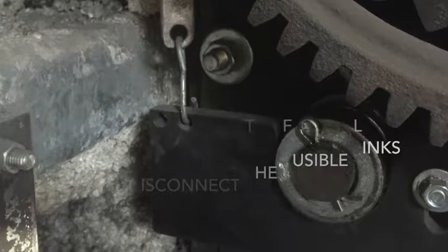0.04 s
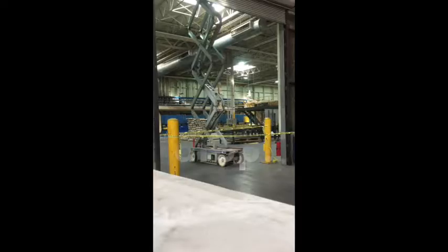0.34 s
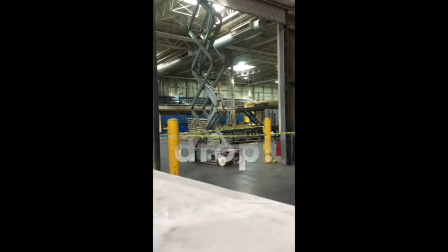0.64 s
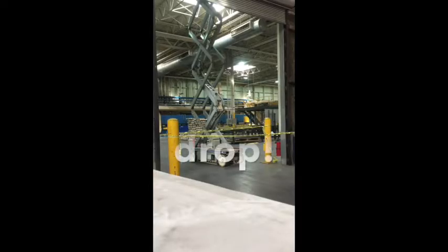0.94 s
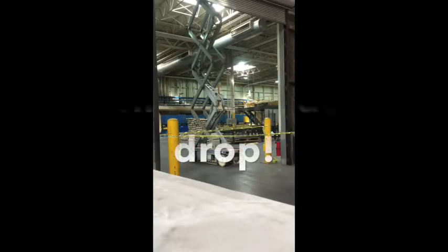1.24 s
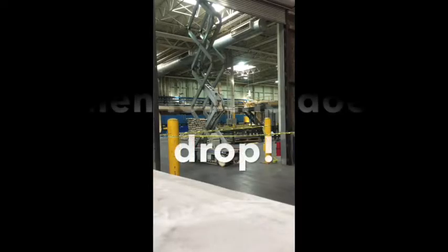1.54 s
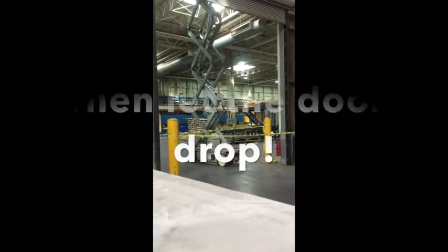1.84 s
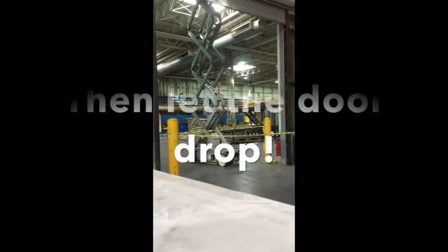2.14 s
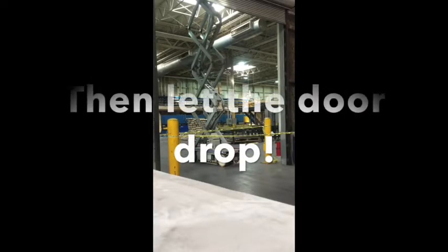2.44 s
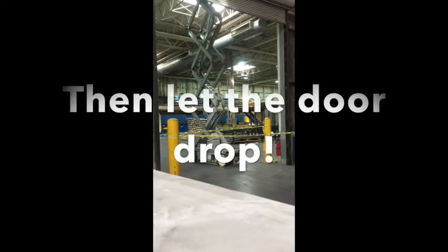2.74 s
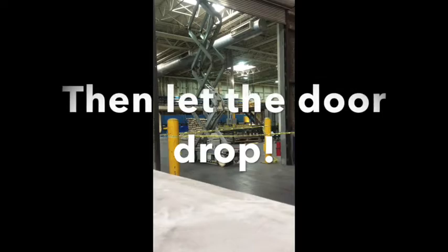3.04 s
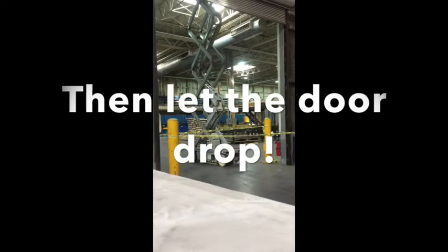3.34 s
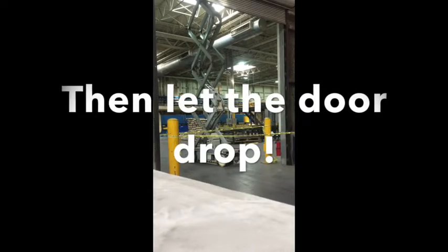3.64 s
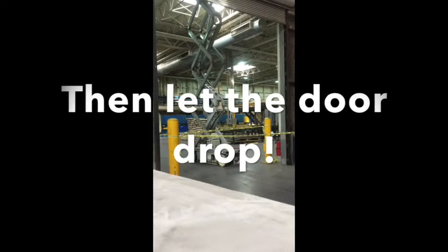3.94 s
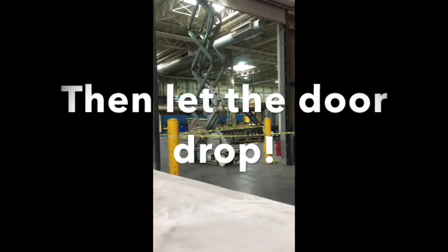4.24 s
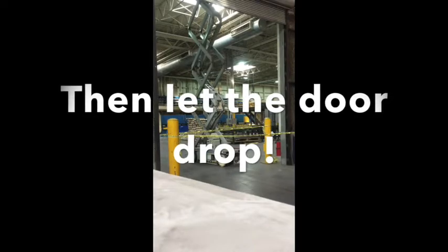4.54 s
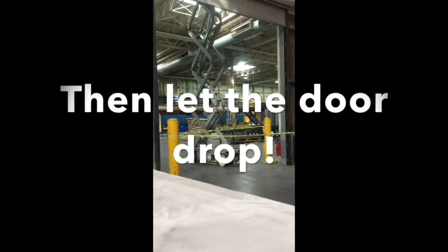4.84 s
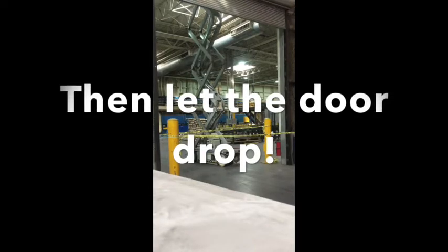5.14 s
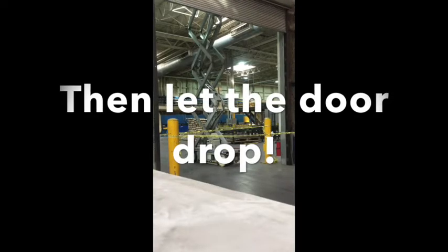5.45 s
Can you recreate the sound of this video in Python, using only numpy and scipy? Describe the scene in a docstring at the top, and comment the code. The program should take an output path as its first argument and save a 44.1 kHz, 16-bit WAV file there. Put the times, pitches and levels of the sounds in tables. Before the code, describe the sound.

Over faint machine rumble and far knocks, a metal roll-up door is released and comes clattering and booming down in a large hall.

```python
"""A steel roll-up door is let go in a large, quiet warehouse.
First, far machinery rumbles and hums; a motor strains and eases off, and hollow knocks and squeaks
carry across the hall. After a soft scuff the catch snaps open and a loose link swings against the gear.
The slack runs out: the slatted curtain lurches with a crash and starts to run down, its joints rattling,
its slats clacking in the guides and its sheet booming like a drum skin, while the hall rings along."""
import sys
import numpy as np
from scipy import signal
from scipy.fft import rfft, irfft, next_fast_len
from scipy.io import wavfile
from scipy.ndimage import uniform_filter1d

SR = 44100
rng = np.random.default_rng(int(sys.argv[2]) if len(sys.argv) > 2 else 0)


def digitize_waveform(pressure):
    """Quantize a signal to 16-bit integers and store it at the path in sys.argv[1].

    Rows of a 2-D input are taken as channels; values are limited to [-1, 1].
    """
    field = np.atleast_2d(pressure).T
    bounded = np.clip(field, -1, 1)
    quanta = np.round(bounded * 32767).astype(np.int16)
    wavfile.write(sys.argv[1], SR, quanta)


N = 251370
TIME = np.arange(N) / SR
RING_TIME = TIME[:SR]  # one second for each hit to ring out
SURGE_S, SCUFF_S, RELEASE_S = 0.77, 4.14, 4.52  # cues
SOFT_BLOW_DB = -30.5  # brightness and boom are scaled from a blow this hard

# room tone of the still air: (frequency [Hz], density [dB])
AIR_SPECTRUM = [(20, -19), (34, -33), (44, -18), (60, -18), (130, -17.5), (300, -22.5), (420, -18.5),
                (800, -30), (3000, -38.5), (6500, -43), (9000, -45.5), (15500, -53)]
# the warehouse's reverb time: (frequency [Hz], t60 [s])
HALL_DECAY = [(80, 3), (250, 0.42), (700, 1.84), (2000, 2.1), (4500, 1.66), (8000, 0.68), (15000, 0.71)]
# swells of the machinery's deep rumble: (time [s], level [dB])
RUMBLE_LEVEL = [(0.34, -68), (0.56, -51), (1.0, -49.5), (1.23, -66), (1.4, -52), (1.88, -62.5), (1.95, -49),
                (2.12, -66), (2.61, -48), (3.16, -67), (4.04, -71.5), (4.38, -67)]
# how hard the machinery works: (time [s], level [dB])
WORKLOAD = [(0.34, -55.5), (0.58, -52), (0.82, -45.5), (1.05, -49), (1.5, -60), (2.1, -56.5), (2.45, -53),
            (2.75, -60.5), (2.9, -65.5), (3.24, -74), (3.4, -60.5), (3.6, -65), (3.85, -79), (4.38, -62)]
# its deep rumble, low-mid body and hiss: (frequency [Hz], density [dB])
RUMBLE_SPECTRUM = [(20, -44), (30, -24), (36, -15), (44, 22), (58, 3), (72, 7.5), (88, 7), (110, -6.5),
                   (170, -59)]
BODY_SPECTRUM = [(70, -9), (125, -1.5), (152, -3), (178, 9), (205, 1.5), (232, 2.5), (280, -10),
                 (350, -3.5), (420, -10.5), (480, -13), (555, -13.5), (640, -10), (760, -27), (1300, -67.5)]
HISS_SPECTRUM = [(400, -19), (800, -3), (1200, -6.5), (1620, -10.5), (1950, -12), (2300, -12), (3000, -17),
                 (5000, -27.5), (8000, -38), (11000, -52), (16000, -70)]
# its hum and whine, and the metal it scrapes along: (frequency [Hz], width [Hz], relative level [dB])
HUM_TONES = [(85, 2.9, -5.5), (156, 17, -14.5), (317, 9.8, -20)]
WHINE_TONES = [(639, 6.28, 3.5), (584, 8.8, -3), (950, 12.3, -8), (1615, 6.3, -14.5), (1934, 16, -14)]
SCRAPED_MODES = [(970, 27, -15), (1340, 130, -12), (1627, 43, -6), (1936, 62, 1), (3330, 38, -10),
                 (4030, 41, -12), (4910, 30, -20)]
# hum, whine and scrape of one straining motor: (peak [dB], rise [dB/s], fall [dB/s])
SURGE_HUM = (-35, 98, 180)
SURGE_WHINE = (-52.5, 60, 33)
SURGE_SCRAPE = (-54.5, 69, 44)
# far knocks: (time [s], level before trim [dB], t60 [s], tilt [dB/octave])
KNOCK_HITS = [(1.118, -52.5, 0.98, 1.5), (1.879, -54, 0.3, 2.5), (2.367, -53.5, 0.52, 3.5),
              (3.281, -56, .27, 2.5), (3.345, -56, .24, 3.5), (3.449, -54, 0.33, -21),
              (3.565, -55.5, 0.13, -15), (4.292, -51.5, 0.21, -23)]
# their thud: (frequency [Hz], density [dB])
THUD_SPECTRUM = [(120, -66), (350, 11), (600, 3), (900, -10), (2500, -27), (6000, -40), (12000, -79)]
# the hollow body they ring: (frequency [Hz], relative level [dB], t60 [s])
HOLLOW_MODES = [(280.4, 3, 0.34), (389.5, -2.5, 0.38), (463.6, 0.5, 0.24), (559, -6.5, 0.27),
                (627, -2.5, 0.34)]
# far squeaks of metal: (time [s], level before trim [dB], pitch [Hz])
SQUEAK_CUES = [(1.109, -70, 1640), (1.135, -67, 2170), (1.179, -78, 2750), (1.882, -71, 2470)]
# swell of the scuff: (peak [dB], rise [dB/s], fall [dB/s])
SCUFF_SWELL = (-63, 320, 210)
# its colour: (frequency [Hz], density [dB])
SCUFF_SPECTRUM = [(80, -3), (200, 8), (700, 2), (2200, -6), (3300, 2.5), (4600, -12), (5900, -5),
                  (7500, -22), (14000, -28)]

# the catch and the loose link strike the gear: (time [s], level [dB], relative tick level [dB])
CATCH_HITS = [(4.419, -42.5, -4.5), (4.526, -9.5, -4.5), (4.532, -29, 12), (4.57, -34, 9),
              (5.194, -34, -16), (5.408, -50, -42)]
LINK_HITS = [(4.652, -37, 6.5), (4.664, -48, 1), (4.702, -35, 10), (4.711, -23.5, -18), (4.752, -34, 1)]
# ring of the catch, link, guide rails and door sheet: (frequency [Hz], relative level [dB], t60 [s])
CATCH_MODES = [(2160, -10, .16), (2907, -14, .2), (3343, -14, .27), (3677, -16, .3), (5265, -13, .1),
               (5655, -1, .09), (6125, 4, .062), (6330, -8, .09), (6560, -15, .18), (6830, -14, .1),
               (8560, -17, .18), (8985, -18, .12), (9695, -19, .24), (11440, -16, .1), (12260, -17, .09)]
LINK_MODES = [(2480, -6, .12), (2660, 0, .15), (2850, -2, .1), (3140, -1, .13), (4440, -9, .16),
              (6780, -15, .18), (7545, -17, .18), (9370, -20, .15), (10290, -18, .14), (11500, -21, .15),
              (12050, -19, .08)]
GUIDE_MODES = [(880, -10, .1), (1140, -12, .1), (1815, 0, .075), (1960, -7, .06), (2290, -15, .08),
               (3020, -16, .07), (4080, -10, .06), (5410, -20, .06)]
SHEET_MODES = [(141, -2.5, .3), (199, 1, .22), (250, -5, .25), (293, 0, .27), (345, 4, .3), (403, 2.5, .27),
               (458, -2, .2), (625, -2, .2), (658, -1, .2), (735, -3, .22), (895, -4.5, .25),
               (1130, -11, .35), (1252, -9, .27), (1456, -11, .42), (1879, -14, .35), (2126, -12, .32),
               (2449, -16, .3), (3042, -14, .28)]
# steel tick, rolling barrel, rattling joints and clashing slats: (frequency [Hz], density [dB])
TICK_SPECTRUM = [(1500, 4.5), (4500, -9), (6200, 0), (7800, -8), (9200, -3), (10600, -13.5), (12100, -4.5),
                 (13500, -16), (16000, -12)]
ROLL_SPECTRUM = [(20, -44), (45, -11), (80, 7), (140, 8.5), (200, 10.5), (290, 1), (350, 8.5), (460, -0.5),
                 (700, 0), (1500, -43.5)]
RATTLE_SPECTRUM = [(200, -34), (450, -11), (1150, 6.5), (1500, 0.5), (1900, 1.5), (2250, -0.5),
                   (3000, -6.5), (4200, -14), (5000, -18.5), (6300, -17), (8000, -28), (16000, -42)]
SLAT_SPECTRUM = [(25, -45), (70, -11), (140, -5), (420, 1), (520, -4.5), (900, -7), (1500, -10), (2600, -9),
                 (4000, -12.5), (5200, -19), (6500, -20), (8000, -24.5), (12000, -29), (16000, -35)]
# slats slap the guides: (time [s], clack [dB], shake [dB], boom before trim [dB], boom pitch [Hz])
SLAPS = [(4.829, -34, -33, -27, 146.5), (5.110, -22, -32.5, -17, 190), (5.170, -27.5, -31.5, -17.5, 196.4),
         (5.244, -39, -40, -22.5, 210), (5.402, -36.5, -43.5, -25, 219.4), (5.555, -22, -28.5, -21, 210),
         (5.603, -27, -28.5, -23, 226), (5.663, -21, -34.5, -23.5, 204)]
# the curtain jerks on its barrel: (time [s], level [dB], t60 [s], relative ring [dB], boom pitch [Hz])
JERKS = [(4.413, -49, 0.53, -1, 620), (4.484, -45.5, 0.36, 10, 465), (4.521, -27, 0.16, -26, 239),
         (4.527, -14, 0.13, -15, 375), (4.547, -26.5, 0.78, -24, 185), (4.660, -26, 0.38, 4, 320),
         (4.705, -26.5, 0.27, -8, 142), (4.847, -7.5, 0.31, -1.5, 212), (4.880, -12, 0.33, -10.5, 342),
         (4.907, -18, 0.38, -21, 108), (5.195, -27, 0.41, -4, 190), (5.626, -29.5, 0.33, 3.5, 348)]


def amp(db):
    """Decibels to gain."""
    return 10 ** (np.asarray(db) / 20)


def unit(x):
    """Scales to rms 1."""
    return x / np.sqrt(np.mean(x ** 2) + 1e-30)


def fader(points):
    """Gain curve through (time [s], level [dB]) points."""
    return amp(np.interp(TIME, *np.transpose(points)))


def surge(peak_s, peak_db, rise_db_per_s, fall_db_per_s):
    """Gain that climbs to one peak and falls away."""
    return amp(peak_db - np.maximum(rise_db_per_s * (peak_s - TIME), fall_db_per_s * (TIME - peak_s)))


def add(mix, s, sound):
    """Mixes a sound in at time s."""
    part = mix[round(s * SR):][:len(sound)]
    part += sound[:len(part)]


def colour(x, spectrum, tilt=0):
    """EQs x with a spectrum, tilted in dB per octave, at rms 1."""
    size = next_fast_len(len(x))
    octave = np.log2(np.fft.rfftfreq(size, 1 / SR) + 1)
    hz, db = np.transpose(spectrum)
    eq = amp(np.interp(octave, np.log2(hz), db + tilt * np.log2(hz)))
    return unit(irfft(rfft(x, size) * eq, size)[:len(x)])


def noise(spectrum, tilt=0, size=N):
    """Coloured noise of rms 1."""
    return colour(rng.standard_normal(size), spectrum, tilt)


def decay(t60):
    """Free decay, 60 dB in t60 seconds."""
    return np.exp(-np.log(1000) * RING_TIME / t60)


def attack(seconds):
    """A vibration building up."""
    return 1 - np.exp(-RING_TIME / seconds)


def ring(modes, pitch=1, spread_db=3):
    """Struck modes starting at rms 1; each hit shares its energy out a little differently."""
    gains = amp(np.array(modes)[:, 1] + spread_db * rng.standard_normal(len(modes)))
    waves = [np.sin(2 * np.pi * (hz * pitch * RING_TIME + rng.random())) * decay(t60)
             for hz, _, t60 in modes]
    return np.sqrt(2) * gains @ np.array(waves) / np.linalg.norm(gains)


def crowded_modes(x, depth_db=1.5, spacing_hz=32, size=8192):
    """Hundreds of plate modes of uneven strength colour x, mostly above 700 Hz."""
    hz = np.fft.rfftfreq(size, 1 / SR)
    strength = np.interp(hz / spacing_hz, np.arange(len(hz)), rng.standard_normal(len(hz)))
    strength -= uniform_filter1d(strength, size=31)
    log_gain = np.log(amp(depth_db * strength * hz ** 2 / (hz ** 2 + 700 ** 2)))
    mirrored = np.r_[log_gain, log_gain[-2:0:-1]]
    plate = np.fft.ifft(np.exp(np.conj(signal.hilbert(mirrored)))).real  # minimum-phase impulse
    return signal.oaconvolve(x, unit(plate) / np.sqrt(size))[:N]


def drift(samples):
    """Smooth random wander of rms 1."""
    return unit(uniform_filter1d(uniform_filter1d(rng.standard_normal(N), samples), samples))


def tones(lines, waver=0.44):
    """Machine tones that wander in pitch and waver in strength through the hall."""
    out = np.zeros(N)
    for hz, width, db in lines:
        gain = amp(db) * (1 + waver * drift(2400))
        phase = 2 * np.pi * np.cumsum(hz + width * drift(1200)) / SR
        out += gain * np.sin(phase)
    return unit(out)


def room_tone(db=-69.5):
    """The still air of the hall: a faint, dark bed."""
    return amp(db) * noise(AIR_SPECTRUM)


def hall(send):
    """Diffuse warehouse reverb: deep bass and mids linger; low mids and top treble fade quickly."""
    spectrum = rfft(rng.standard_normal(SR))
    octave = np.log2(np.arange(len(spectrum)) + 1)
    hz, t60s = np.transpose(HALL_DECAY)
    bands = [irfft(spectrum * np.interp(octave, np.log2(hz), band)) for band in np.eye(len(hz))]
    tail = sum(band * decay(t60) for band, t60 in zip(bands, t60s)) * attack(0.0013)
    return signal.fftconvolve(send, tail / np.linalg.norm(tail))[:N]


def scrape(work, hiss_db=-72.5, hiss_follow=0.41):
    """Hiss rides the workload; the straining motor lifts it and scrapes metal into resonance."""
    strain = surge(SURGE_S, *SURGE_SCRAPE)
    hiss_gain = np.hypot(amp(hiss_db) * work ** hiss_follow, amp(-1.5) * strain)
    hiss = crowded_modes(noise(HISS_SPECTRUM), depth_db=3, spacing_hz=44.87)
    metal = np.zeros(N)
    for hz, width, db in SCRAPED_MODES:
        resonance = signal.iirpeak(hz, hz / width, SR)
        metal += amp(db) * unit(signal.lfilter(*resonance, rng.standard_normal(N)))
    return hiss_gain * hiss + amp(-8) * strain * unit(metal)


def machinery(ordinary_work_db=-55.5, drone_hz=44):
    """Far machines rumble over a low drone; hum, whine and scrape follow the work and the motor's surge."""
    workload = fader(WORKLOAD)
    work = workload / amp(ordinary_work_db)
    rumble = amp(-1) * fader(RUMBLE_LEVEL) * noise(RUMBLE_SPECTRUM)
    body = amp(-0.46) * workload * noise(BODY_SPECTRUM)
    scraping = scrape(work)
    drone = amp(-72) * tones([(drone_hz, 1, 0)])
    hum = np.hypot(amp(-65.5) * work, surge(SURGE_S, *SURGE_HUM)) * tones(HUM_TONES)
    whine = np.hypot(amp(-70) * work, surge(SURGE_S, *SURGE_WHINE)) * tones(WHINE_TONES)
    return rumble + body + scraping + drone + hum + whine


def knocks(trim_db=-2, ring_db=-7):
    """Dull, smeared knocks on something hollow across the hall."""
    out = np.zeros(N)
    for s, db, t60, tilt in KNOCK_HITS:
        thud = noise(THUD_SPECTRUM, tilt, size=SR) * decay(t60)
        add(out, s, amp(db + trim_db) * (thud + amp(ring_db) * ring(HOLLOW_MODES)) * attack(0.0024))
    return out


def squeaks(trim_db=10.5, t60=0.09, half_width=0.06):
    """Far metal squeaks: brief, rough bursts of narrow-band noise."""
    out = np.zeros(N)
    for s, db, hz in SQUEAK_CUES:
        band = signal.butter(2, [hz * (1 - half_width), hz * (1 + half_width)], "band", fs=SR)
        rub = unit(signal.lfilter(*band, rng.standard_normal(SR)))
        add(out, s, amp(db + trim_db) * rub * decay(t60) * attack(0.0086))
    return out


def scuff():
    """Something slides softly just before the release."""
    return surge(SCUFF_S, *SCUFF_SWELL) * noise(SCUFF_SPECTRUM)


def steel_part(hits, modes, tick_t60=0.034, twin_db=-5):
    """Steel on steel: a bright tick and a high ring whose modes beat in close pairs."""
    out = np.zeros(N)
    for s, db, tick_db in hits:
        tick = amp(tick_db) * noise(TICK_SPECTRUM, size=SR) * decay(tick_t60)
        twins = amp(twin_db) * ring(modes, pitch=rng.uniform(0.995, 1.005))
        ringing = amp(-4.5) * (ring(modes) + twins)
        add(out, s, amp(db) * (ringing + tick) * attack(0.00021))
    return out


def crack(s=4.8505, db=-12, t60=0.081):
    """The slack runs out and steel meets steel at the head of the crash."""
    out = np.zeros(N)
    add(out, s, amp(db) * noise(TICK_SPECTRUM, tilt=0.5, size=SR) * decay(t60))
    return out


def strikes(rebound_s=0.0145, rebound_db=-0.5):
    """Each slap and its rebound: (time [s], clack [dB], shake [dB])."""
    return [(s + k * rebound_s, clack_db + k * rebound_db, shake_db + k * rebound_db)
            for s, clack_db, shake_db, _, _ in SLAPS for k in (0, 1)]


def blows(shake_t60=0.25, sheet_db=5.5):
    """Every jerk and strike on the curtain: (time [s], level [dB], t60 [s], relative ring [dB])."""
    return [row[:4] for row in JERKS] + [(s, db, shake_t60, sheet_db) for s, _, db in strikes()]


def joint_taps(taps_per_s=260, spread_db=2, t60=0.12, joints=12):
    """Slat joints tap at random, a few of them hard, each with its own noise burst."""
    onsets = rng.random(N) < taps_per_s / SR
    taps = onsets * amp(spread_db * np.minimum(rng.exponential(1, N), 3))
    joint = rng.integers(0, joints, N)
    chatter = np.zeros(N)
    for k in range(joints):
        burst = (rng.standard_normal(SR) * decay(t60))[:SR // 10]
        chatter += signal.oaconvolve(taps * (joint == k), burst)[:N]
    return colour(chatter, RATTLE_SPECTRUM)


def running(roll_db=-34, roll_db_per_s=4, rattle_db=-38, settle_t60=0.78):
    """Once released, the barrel rolls louder as it gathers speed; every blow stirs up the joints."""
    stirred_power = np.zeros(N)
    for s, db, _, _ in blows():
        stir = amp(-18.5 + 0.55 * db) * attack(0.028) * decay(settle_t60)
        add(stirred_power, s, stir ** 2)
    rattle = np.sqrt(amp(rattle_db) ** 2 + stirred_power) * joint_taps()
    elapsed = TIME - RELEASE_S
    roll = amp(roll_db + roll_db_per_s * elapsed) * noise(ROLL_SPECTRUM)
    return crowded_modes((roll + rattle) * np.clip(elapsed / 0.01, 0, 1))


def clacks(grit_db=-9, grit_t60=0.017, detune=0.017):
    """Slat ends slap the guide rails, which ring briefly, never quite at the same pitch."""
    out = np.zeros(N)
    for s, db, _ in strikes():
        grit = amp(grit_db) * noise(RATTLE_SPECTRUM, tilt=1.5, size=SR) * decay(grit_t60)
        rail = ring(GUIDE_MODES, pitch=1 + detune * rng.standard_normal())
        add(out, s, amp(db) * (rail + grit) * attack(0.00049))
    return out


def booms(trim_db=3, t60=0.15, lag_s=0.00711, sway_hz=87, sway_db=-17, sway_t60=0.35):
    """Just after a slap or jerk a low ring follows, more if it is hard: the free-hanging curtain flexes like a
    drum skin, and at the release the catch's bracket rings."""
    out = np.zeros(N)
    slaps = [(s, db, hz) for s, _, _, db, hz in SLAPS]
    jerks = [(s, SOFT_BLOW_DB + 0.46 * (db - SOFT_BLOW_DB), hz)
             for s, db, _, _, hz in JERKS if s > RELEASE_S]
    for s, db, hz in slaps + jerks:
        flex = ring([(hz, 0, t60), (sway_hz, sway_db, sway_t60)])  # the sway is its lowest mode
        add(out, s + lag_s, amp(db + trim_db) * flex * attack(0.0033) ** 2)
    return out


def curtain(split_hz=5000, treble_life=0.65):
    """Each blow shakes all the slats at once, treble dying first, and rings the sheet."""
    slats, sheet = np.zeros((2, N))
    lowpass = signal.butter(1, split_hz, fs=SR)
    for s, db, t60, sheet_db in blows():
        tilt = -0.44 - 0.06 * (db - SOFT_BLOW_DB)  # harder blows lean towards the bass
        clash = noise(SLAT_SPECTRUM, tilt, size=SR)
        low = signal.lfilter(*lowpass, clash)
        shake = low * decay(t60) + (clash - low) * decay(t60 * treble_life)
        add(slats, s, amp(db) * shake * attack(0.00073))
        add(sheet, s, amp(db + sheet_db) * ring(SHEET_MODES) * attack(0.0019))
    return crowded_modes(slats) + sheet


def scene():
    """Mono mix: the door fairly dry, the far knocks and squeaks wet, over the machinery bed."""
    slats, rails, drum, far = curtain(), clacks(), booms(), knocks() + squeaks()
    steel = steel_part(CATCH_HITS, CATCH_MODES) + steel_part(LINK_HITS, LINK_MODES) + crack()
    send = amp(-14) * slats + amp(-20) * steel + amp(-15) * rails + amp(-18.5) * drum + amp(-0.5) * far
    reverb = hall(send)
    door = slats + steel + rails + drum + running()
    return (door + far + reverb + machinery() + room_tone() + scuff())[None]


def record(dry, start_s=0.325, ceiling=0.55, cutoff_hz=15900):
    """Master chain: a quick fade-in, soft overload on the crash, and a steep low-pass."""
    opened = dry * np.clip((TIME - start_s) / 0.01, 0, 1)
    saturated = opened / (1 + abs(opened / ceiling) ** 5) ** (1 / 5)
    lowpass = signal.firwin(511, cutoff_hz, window=("kaiser", 9), fs=SR)
    return signal.oaconvolve(saturated, lowpass[None], "same")


dry = scene()
out = record(dry)
digitize_waveform(out)
```